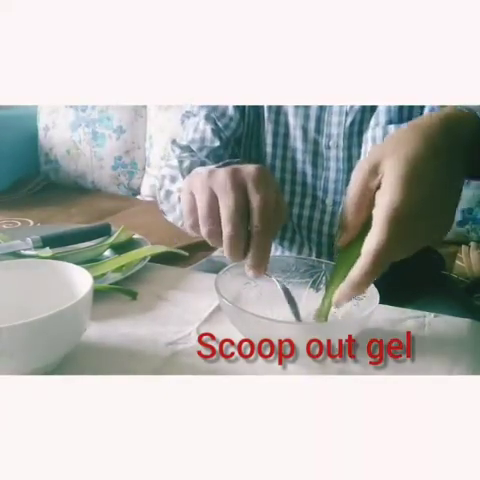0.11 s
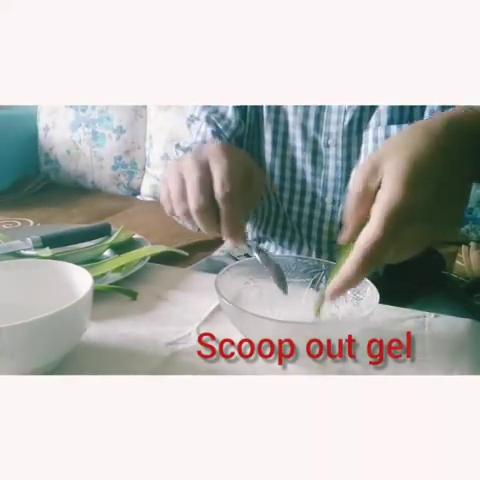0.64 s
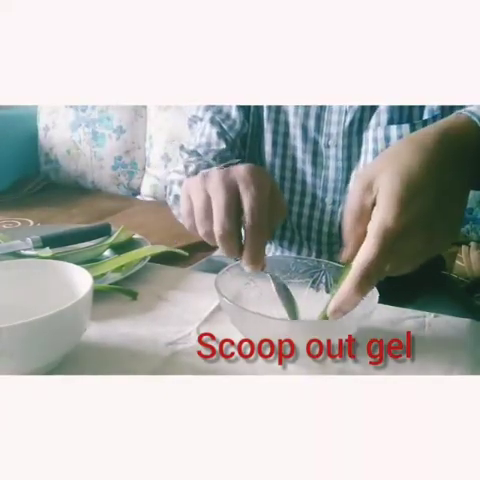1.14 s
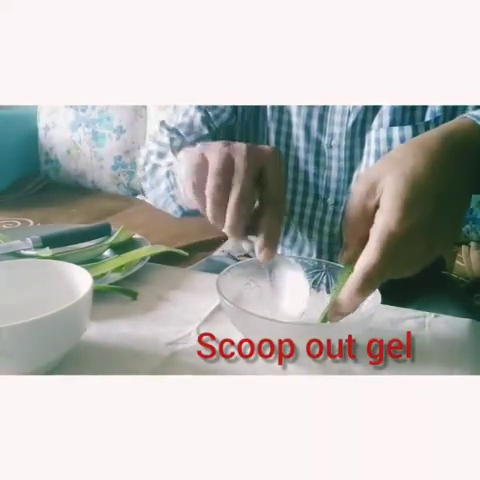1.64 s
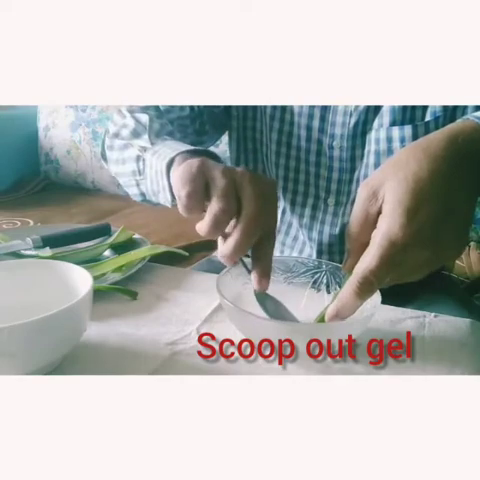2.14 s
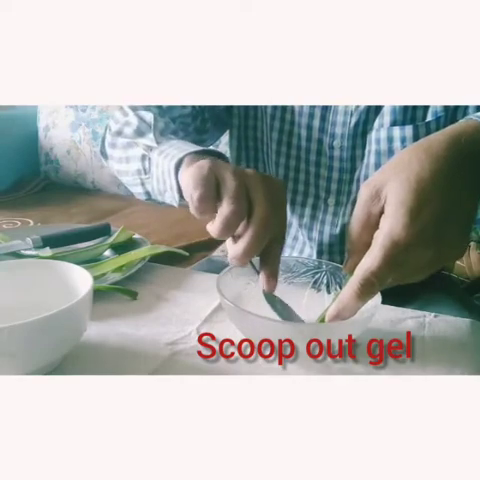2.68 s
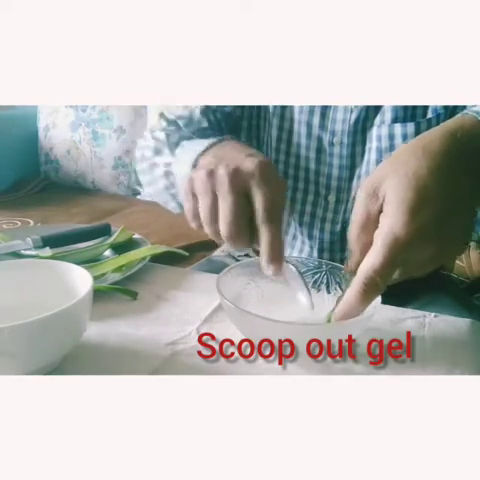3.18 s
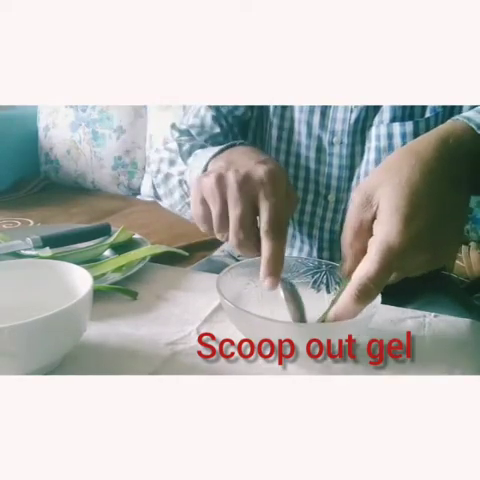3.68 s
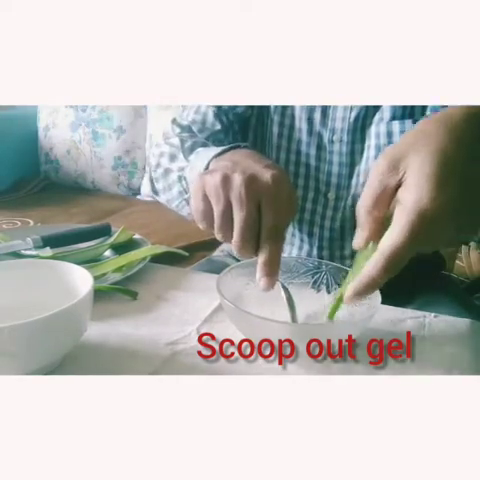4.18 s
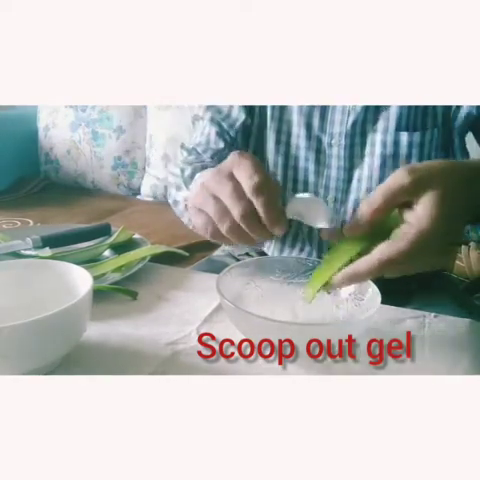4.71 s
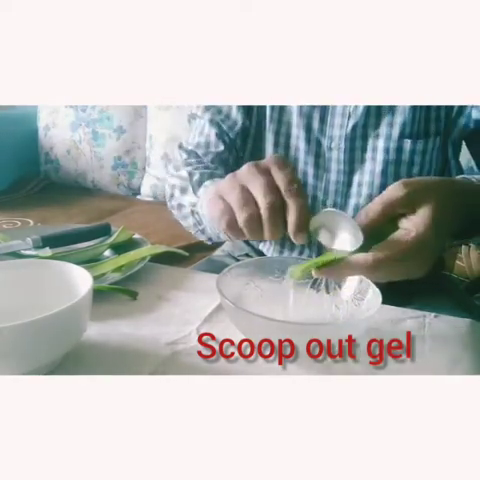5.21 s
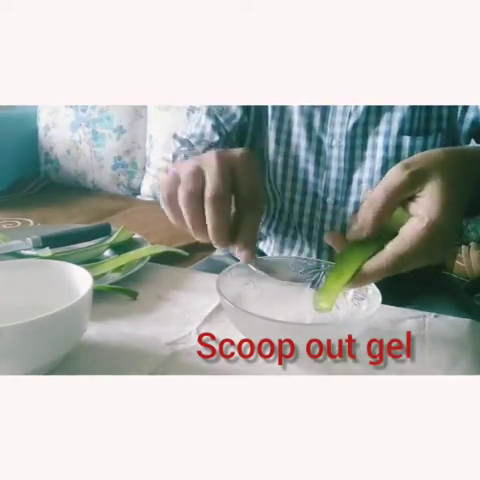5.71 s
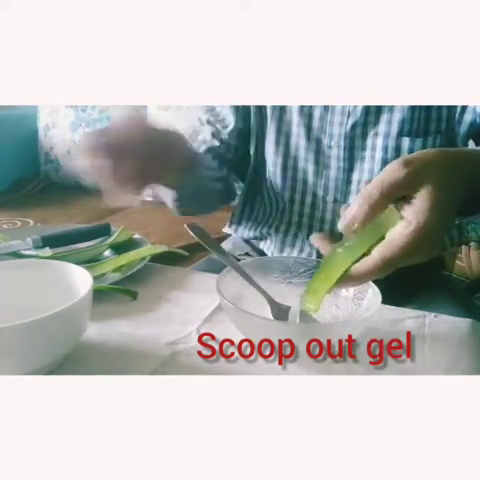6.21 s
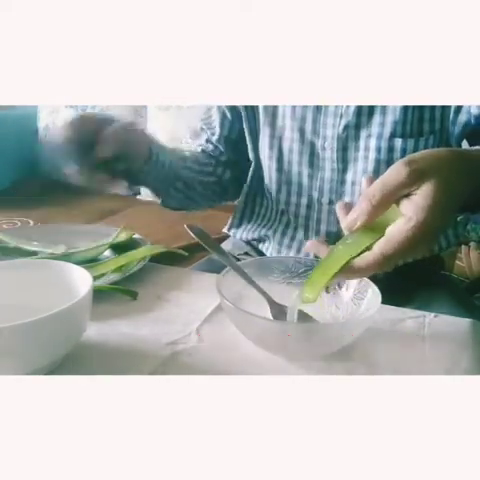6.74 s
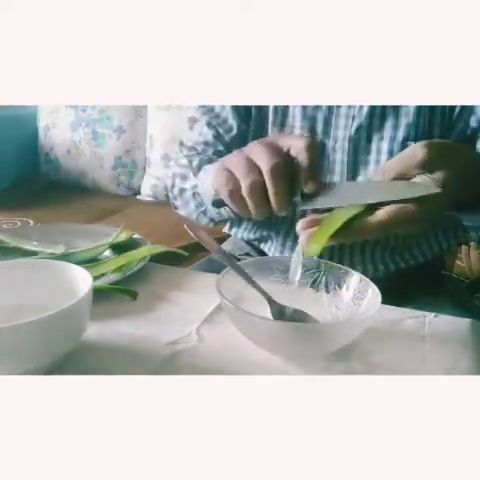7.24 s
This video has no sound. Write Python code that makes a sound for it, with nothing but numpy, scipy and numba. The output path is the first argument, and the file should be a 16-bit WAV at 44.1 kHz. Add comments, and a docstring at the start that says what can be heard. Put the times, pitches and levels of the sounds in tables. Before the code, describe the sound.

Sparse spoon taps on glass, thudding wind on the microphone, tiny wet blips and distant chirps, ending with a bright spoon drop chattering on the bowl before quiet.

```python
"""A steel spoon clinks in a glass bowl, then is dropped in: sums of decaying modes plus short noise cracks.
A draught rumbles and buffets two microphone ports (filtered noise, short swings) and whistles at the left one.
Small birds chirp outside (warbled sines); wet gel pops (rising sines); a soft room hum is coloured noise.
The loud drop makes the phone turn its gain down."""
import sys
import numpy as np
from scipy import signal
from scipy.fft import rfft, irfft
from scipy.io import wavfile
from scipy.ndimage import uniform_filter1d, minimum_filter1d
from numba import njit

SR = 44100
rng = np.random.default_rng(int(sys.argv[2]) if len(sys.argv) > 2 else 0)


def ratio(d):
    """dB to gain"""
    e = np.asarray(d, float) / 20
    return 10 ** e


def digitize_waveform(pressure):
    """Quantize a signal to 16-bit integers and store it at the path in sys.argv[1].

    Rows of a 2-D input are taken as channels; values are limited to [-1, 1].
    """
    field = np.atleast_2d(pressure).T
    bounded = np.clip(field, -1, 1)
    quanta = np.round(bounded * 32767).astype(np.int16)
    wavfile.write(sys.argv[1], SR, quanta)


N = 325017
T = np.arange(N) / SR
SIDES = np.array([[1], [-1]])  # left, right
ROOM_T60_S, ROOM_DB = 0.24, -1.5


def unit(x):
    """Scale to rms 1."""
    return x / np.sqrt(np.mean(x ** 2))


def colour(x, points):
    """Give noise the spectrum of (Hz, dB) points."""
    hz, db = np.transpose(points)
    f = np.arange(x.shape[-1] // 2 + 1) * SR / x.shape[-1] + 1
    gain = ratio(np.interp(np.log(f), np.log(hz), db))
    return irfft(rfft(x) * gain, x.shape[-1])


def band(x, hz, width_hz):
    """One resonance."""
    return signal.lfilter(*signal.iirpeak(hz, hz / width_hz, fs=SR), x)


def walk(rate_hz):
    """Random levels held 1 / rate_hz and slewed twice, rms 1."""
    k = int(SR / rate_hz)
    steps = np.repeat(rng.standard_normal(N // k + 1), k)
    return unit(uniform_filter1d(uniform_filter1d(steps, k), k)[:N])


def swell(base_db, rows, rise_s, fall_s):
    """Gain of a base level plus, in power, swells that rise, hold and die away exponentially."""
    power = ratio(base_db) ** 2
    for s, held_s, db in rows:
        early = np.maximum(s - T, 0) / rise_s
        late = np.maximum(T - s - held_s, 0) / fall_s
        power = power + ratio(db) ** 2 * np.exp(-2 * (early + late))
    return np.sqrt(power)


def add(out, s, x):
    """Mix x in at time s."""
    i = max(int(s * SR), 0)
    out[..., i:i + x.shape[-1]] += x[..., :N - i]


def echo(x, t60_s, db, gap_s):
    """Direct sound plus a diffuse tail, different at each port."""
    t = np.arange(SR // 2) / SR
    tail = rng.standard_normal((2, len(t))) * ratio(-60 * t / t60_s) * (1 - np.exp(-t / gap_s))
    tail = tail / np.sqrt(np.sum(tail ** 2, axis=1, keepdims=True))
    return x + ratio(db) * signal.fftconvolve(x, tail, axes=1)[:, :N]


# Modes of the spoon, the bowl pressed down by the hand, the bowl ringing free, its thick floor.
# Each row: frequency in Hz, relative level in dB, t60 in seconds.
SPOON_MODES = [(1573, -8.5, 0.017), (1977, -10.5, 0.032), (2685, -18, 0.062), (3753, -16, .1),
               (4530, -4.5, 0.011), (5860, -17, .03), (8550, -15, 0.068), (10270, 0.5, 0.057),
               (10160, 3.5, 0.021), (11643, -11.5, 0.13), (12720, -11, 0.057), (13350, -10.5, .06),
               (14530, -18.5, .08), (15700, -13, .02), (15670, -14, .08)]
BOWL_HELD_MODES = [(1252, -27, 0.038), (2350, -20.5, 0.066), (3470, -12.5, 0.015), (4870, -3, 0.011),
                   (5750, -3, 0.0097), (7770, 6.5, 0.011), (8440, -15.5, 0.12), (9176, 5, 0.021),
                   (9660, -3, 0.037), (10100, 9.5, 0.0073), (11000, -9, 0.035), (10970, -6.5, 0.063),
                   (11500, -1.5, 0.023), (12830, -1.5, 0.03), (15600, 5, 0.014), (14600, -8, 0.022)]
BOWL_FREE_MODES = [(2100, -25, .06), (2476, -13, .22), (2510, -20, .15), (2940, -27, .08), (3590, -23, .09),
                   (4286, -11, .11), (4310, -18, .15), (5060, -16, .1), (5142, -22, .22), (5570, -19, .04),
                   (6420, -15, .12), (6514, -17, .28), (6700, -16, .1), (7466, -13, .16), (7830, -20, .06),
                   (6990, -19, .06), (8940, -13, .12), (9024, 1, .2), (9500, -18, .06), (10100, -16, .06),
                   (10606, -8, .16), (11940, -4, .15), (12300, -16, .08), (12700, -12, .06),
                   (13545, -13, .14), (13928, -7, .14), (14347, -13, .12), (14543, -14, .14),
                   (15104, -9, .15), (15715, -25, .2)]
BOWL_FLOOR_MODES = [(1108.5, -4, 0.24), (3457, -13, 0.017), (4370, -4.5, .03), (5120, 6, 0.041),
                    (5614, -9.5, .03)]
# Ring balance over frequency. Each row: frequency in Hz, left minus right in dB.
RING_PAN = [(1100, -9.5), (2500, -0.5), (4400, -1.5), (9000, -4.5), (12000, 12), (15000, 2)]
# Further balance of the four mode sets: left minus right in dB.
BODY_PAN_DB = [-2.5, -1, 0, 2]


def ring(blows):
    """Each blow excites the four sets of decaying modes, with its own random strike point."""
    t, out = np.arange(SR * 2 // 5) / SR, np.zeros((2, N))
    sets = (SPOON_MODES, BOWL_HELD_MODES, BOWL_FREE_MODES, BOWL_FLOOR_MODES)
    hz, db, t60_s = np.transpose([mode for modes in sets for mode in modes])
    body = np.repeat(np.arange(len(sets)), [len(modes) for modes in sets])
    onset = 1 - np.exp(-t / 0.00023)
    rings = np.exp(np.outer(2j * np.pi * hz - np.log(1000) / t60_s, t)) * onset
    pan_hz, pan_db = np.transpose(RING_PAN)
    side_db = np.interp(np.log(hz), np.log(pan_hz), pan_db) + np.array(BODY_PAN_DB)[body]
    ports = np.exp(2j * np.pi * rng.random((2, len(hz))))  # each mode has its own phase at each port
    octaves_up = np.clip(np.log2(hz / 10500), 0, 1)
    for s, *body_db, _ in blows:
        spot = ratio(2.5 * rng.standard_normal(len(hz))) * np.exp(2j * np.pi * rng.random(len(hz)))
        dull_db = 3.0 * min(max(body_db) + 45.5, 0) * octaves_up  # a light touch misses the top modes
        level_db = db + dull_db + np.array(body_db)[body] + SIDES * side_db / 2
        add(out, s, ((ratio(level_db) * spot * ports) @ rings).imag)
    return out


# Spectrum of the contact crack. Each row: frequency in Hz, relative density in dB per Hz.
CRACK_SPECTRUM = [(500, -48), (1000, -3.5), (2000, -2), (4000, -1.5), (7000, -3.5), (10000, -1), (14500, 2),
                  (16000, -28.5)]


def cracks(blows):
    """Short noise burst at each contact, with a quick rise of a few ms and a quick decay."""
    out, t = np.zeros((2, N)), np.arange(-512, 1024) / SR
    shape = np.exp(np.where(t < 0, t / 0.0017, -t / 0.0016))
    for s, *_, db in blows:
        n = rng.standard_normal((3, len(t)))
        noise = n[:2] + 0.9 * n[2]  # partly shared by the ports
        add(out, s + t[0], ratio(db) * shape * unit(colour(noise, CRACK_SPECTRUM)))
    return out


# The dropped spoon rocks and chatters on the rim, leaning on the glass. Each row: time in seconds,
# tap strength in dB, level of the whole clink layer in dB (interpolated; end values held outside).
CHATTER = [(6.152, -17.5, -1.5), (6.182, -9.5, 0), (6.201, -6.5, -1), (6.21, -25.5, -4), (6.24, -11, 3),
           (6.263, -23.5, 2), (6.276, -17, -0.5), (6.308, -20.5, 1.5), (6.335, -31, -3.5), (6.36, -26, -3)]


def chatter():
    """30 near-even taps on the free bowl, strength following the chatter table."""
    when, strength_db, _ = np.transpose(CHATTER)
    taps = np.linspace(when[0], when[-1], num=30) + .005 * rng.random(30)
    tap_db = np.interp(taps, when, strength_db)
    return [(s, db - 39.5, db - 12.5, db, db - 26, db - 37.5) for s, db in zip(taps, tap_db)]


# Spoon blows. Each row: time in seconds, then levels in dB of the spoon, held bowl, free bowl,
# bowl floor and crack.
BLOWS = [(0.066, -27.5, -48.5, -68, -51.5, -28.5), (0.491, -49.5, -82, -90, -82, -82),
         (1.097, -18, -46, -63, -43, -16.5), (1.103, -18, -47.5, -64, -54.5, -24.5),
         (2.691, -39.5, -20, -57.5, -52.5, -34.5), (2.695, -50.5, -43, -80, -64, -37),
         (3.923, -32.5, -64, -68, -75, -33), (3.935, -42, -65, -73.5, -69, -68),
         (4.421, -53, -80, -92, -92, -77.5), (6.012, -58, -50, -57.5, -68, -48),
         (6.024, -47.5, -39.5, -52, -67.5, -44), (6.028, -40, -28, -49, -44, -46),
         (6.031, -48.5, -31, -41.5, -44.5, -59.5), (6.035, -41, -37.5, -47, -38.5, -44),
         (6.149, -30.5, -17.5, -10, -49, -28.5)]


def clinks():
    """Spoon on glass: ringing modes and cracks of every blow and tap, in the room."""
    blows = list(BLOWS) + chatter()
    when, _, layer_db = np.transpose(CHATTER)
    wet = echo(ring(blows) + cracks(blows), ROOM_T60_S, ROOM_DB, 0.0049)
    return wet * ratio(np.interp(T, when, layer_db))


# Base draught under gusts and swells. Each row: time in seconds, left rumble in dB, right rumble in dB,
# whistle at the left port in dB. Rumble levels are ahead of the port high-pass.
BREEZE = [(0.0, -57, -50, -60), (1.301, -60.5, -57, -60.5), (2.0, -62.5, -56, -62),
          (2.9, -60, -58.5, -62.5), (3.1, -62.5, -62, -58.5), (3.55, -66.5, -68, -58.5),
          (4.0, -64, -53, -59), (4.45, -65.5, -71.5, -64), (4.8, -63.5, -65, -65.5), (5.1, -91, -100, -61),
          (5.3, -73, -66, -81), (5.55, -59.5, -52, -62), (6.05, -55.5, -52, -68.5), (6.3, -61, -66, -62.5),
          (6.501, -59.5, -68, -60), (6.7, -87.5, -84.5, -76), (7.15, -97, -76, -79), (7.37, -66, -60, -73)]
# Gusts. Each row: time at full level in seconds, hold in seconds, rumble in dB, port (0 left, 1 right).
GUSTS = [(0.08, 0.11, -44, 1), (0.251, 0.22, -33, 1), (0.21, 0.12, -40, 0), (0.47, 0.034, -49, 0),
         (0.609, 0.057, -42.5, 1), (0.71, 0.089, -39.5, 1), (0.83, 0.071, -50, 0), (0.948, 0.16, -43.5, 1),
         (1.041, 0.068, -47.5, 0), (1.47, 0.034, -61.5, 0), (1.58, 0.18, -49, 1), (2.53, 0.1, -51, 1),
         (2.73, 0.09, -39, 1), (3.79, 0.13, -45.5, 1), (3.88, 0.13, -56, 0), (4.178, 0.027, -45.5, 1),
         (5.34, 0.078, -40.5, 1), (5.576, 0.062, -32, 1), (5.58, .12, -47.5, 0), (5.66, 0.1, -43.5, 1),
         (6.38, 0.048, -54.5, 0), (6.421, 0.075, -52.5, 1), (6.88, 0.048, -57, 1), (7.27, .12, -43.5, 1)]


def rumble_gain(port):
    """Breeze plus the gusts that hit this port."""
    breeze = np.transpose(BREEZE)
    gusts = [gust[:-1] for gust in GUSTS if round(gust[-1]) == port]
    return swell(np.interp(T, breeze[0], breeze[1 + port]), gusts, rise_s=0.0113, fall_s=0.045)


def rumble(gain):
    """Turbulent eddies: lumpy noise through two low resonances."""
    centre_hz, width_hz, lump_db = 146.8, 61.7, 2.5
    eddies = band(band(rng.standard_normal(N), centre_hz, 4.5 * width_hz), centre_hz, width_hz)
    low_pass = signal.butter(3, 420, fs=SR, output="sos")
    return unit(signal.sosfilt(low_pass, eddies * ratio(lump_db * walk(35)))) * gain


def chance_buffets(gain, port):
    """Random buffets that follow the rumble level; harder ones are quicker."""
    per_s, above_rumble_db, scatter_db = 40, 4.5, 4
    hz_at_minus_33_db, hz_per_db = 156.4, 3.5
    count = int(per_s * N / SR)
    at = rng.random(count) * T[-1]
    peak_db = 20 * np.log10(np.interp(at, T, gain)) + above_rumble_db
    peak_db = peak_db + scatter_db * rng.standard_normal(count)
    hz = np.maximum(hz_at_minus_33_db + hz_per_db * (peak_db + 33), 130)
    hz = hz * (1 + 0.22 * rng.standard_normal(count))
    return list(zip(at, peak_db, hz, [port] * count))


# Strongest buffets of air. Each row: time in seconds, envelope peak in dB ahead of the port high-pass,
# frequency in Hz, port (0 left, 1 right).
PUFFS = [(0.087, -27, 140, 1), (0.112, -28, 161, 1), (0.144, -31, 174, 1), (0.253, -25, 156, 0),
         (0.271, -25, 149, 1), (0.278, -35, 154, 0), (0.32, -24.5, 172, 1), (0.337, -17.5, 194, 1),
         (0.347, -21, 190, 1), (0.393, -17.5, 165, 1), (0.414, -14, 216, 1), (0.427, -17.5, 220, 1),
         (0.507, -19.5, 160, 1), (0.631, -26.5, 174, 1), (0.893, -31, 145, 0), (1.033, -28.5, 193, 0),
         (1.714, -25.5, 154, 1), (1.741, -26, 148, 1), (2.347, -32, 212, 0), (2.531, -29, 209, 0),
         (2.728, -22, 165, 1), (2.744, -25.5, 218, 1), (2.763, -28.5, 138, 1), (3.829, -23, 145, 1),
         (3.899, -31, 150, 1), (4.212, -33.5, 264, 0), (4.235, -32.5, 260, 0), (5.34, -24.5, 182, 1),
         (5.407, -28, 160, 1), (5.55, -29, 135, 1), (5.57, -18, 196, 1), (5.607, -13.5, 239, 1),
         (5.637, -25, 196, 1), (5.679, -25, 190, 1), (5.705, -29.5, 156, 1), (5.741, -26.5, 148, 1),
         (5.839, -36.5, 268, 0), (6.052, -33.5, 147, 1), (6.103, -35, 117, 0), (6.469, -28, 241, 1),
         (7.277, -28.5, 130.8, 1), (7.297, -27.5, 150, 1), (7.336, -33.5, 140, 1)]


def buffets(rows):
    """Each puff is about two pressure swings, dying slower than they rise."""
    out, t = np.zeros((2, N)), np.arange(-1024, 1024) / SR
    for s, db, hz, port in rows:
        cycles = t * hz / np.where(t < 0, .55, .9)
        swing = np.cos(2 * np.pi * (hz * t + rng.random()))
        add(out[round(port)], s + t[0], ratio(db) * np.exp(-cycles ** 2) * swing)
    return out


# Port cavity resonances. Each row: frequency in Hz, width in Hz, relative level in dB.
WHISTLE_MODES = [(611, 84, 4.5), (760, 44, -12)]
# Whistle swells. Each row: time at full level in seconds, hold in seconds, left-port level in dB.
WHISTLE_SWELLS = [(0.27, .25, -53), (0.58, 0.11, -54.5), (1.17, 0.079, -52.5), (1.57, 0.055, -58),
                  (2.08, 0.15, -53), (2.48, 0.069, -61.5), (2.88, 0.033, -60), (3.17, 0.18, -56),
                  (3.87, 0.23, -57.5), (4.6, 0.26, -55), (5.68, 0.044, -59.5), (5.88, .13, -56),
                  (6.57, .05, -51.5)]


def whistle():
    """Fluctuating air noise excites the cavity resonances; 14 dB weaker at the right."""
    air = rng.standard_normal(N) * ratio(2.8 * walk(25))
    tone = unit(sum(ratio(db) * band(band(air, hz, 2 * w), hz, w) for hz, w, db in WHISTLE_MODES))
    s, _, _, base_db = np.transpose(BREEZE)
    gain = swell(np.interp(T, s, base_db), WHISTLE_SWELLS, rise_s=0.03, fall_s=0.023)
    return tone * gain * ratio(np.array([[0], [-14]]))


def draught():
    """Turbulence unrelated left and right, less below the ports' 60 Hz corner, plus the whistle."""
    gains = [rumble_gain(port) for port in (0, 1)]
    rows = list(PUFFS) + chance_buffets(gains[0], 0) + chance_buffets(gains[1], 1)
    air = np.array([rumble(gain) for gain in gains]) + buffets(rows)
    return signal.sosfilt(signal.butter(1, 60, "high", fs=SR, output="sos"), air) + whistle()


# Bird calls. Each row: start in seconds, length in seconds, centre frequency in Hz, warble swing in Hz,
# level in dB before flutter and echo, left minus right in dB.
CHIRPS = [(0.196, 0.1, 6410, 335, -60.5, -15.5), (0.362, 0.12, 3837, 121, -64, 4),
          (1.288, 0.085, 6220, 250, -73, -21), (1.707, 0.1, 6430, 556, -72, -25.5),
          (2.446, 0.13, 6440, 250, -74.5, -21.5), (3.096, 0.09, 6530, 423, -64, -17.5),
          (3.259, 0.13, 3593, 60, -62.5, 7), (3.279, 0.083, 4140, 150, -67, 5),
          (3.288, 0.11, 5110, 200, -72.5, -10), (4.274, 0.065, 3880, 302, -64.5, 9),
          (4.45, 0.061, 6300, 202, -77, -20), (5.35, .06, 4980, 100, -73, -8.5),
          (5.467, 0.092, 6770, 148, -60, -5.5), (5.766, 0.034, 5900, 50, -69, -16),
          (5.902, 0.086, 3680, 118, -60.5, 1), (6.766, 0.066, 6740, 39.7, -62.5, -15),
          (7.195, .155, 6420, 202.6, -77.5, -17.5)]


def birds():
    """Fluttering whistles in quick falling sweeps, smeared by walls outside."""
    warble_hz, rasp_per_swing = 29.57, .3
    yard_t60_s, yard_db = 0.35, 1
    out = np.zeros((2, N))
    flutter, rasp = ratio(6.6 * walk(110)), walk(400)
    for s, length_s, hz, swing_hz, db, side_db in CHIRPS:
        t = np.arange(int(length_s * SR)) / SR
        pitch = hz * (1 - 0.01904 * (t / length_s - .5))
        pitch = pitch + swing_hz * signal.sawtooth(2 * np.pi * warble_hz * t, width=0)
        pitch = pitch + (30 + rasp_per_swing * swing_hz) * rasp[int(s * SR):][:len(t)]
        fade = np.clip(np.minimum(t, length_s - t) / 0.029, 0, 1)
        call = np.sin(2 * np.pi * np.cumsum(pitch) / SR) * fade
        add(out, s, ratio(db + SIDES * side_db / 2) * call)
    return echo(out * flutter, yard_t60_s, yard_db, 0.015)


# Short wet blips of gel. Each row: start in seconds, relative level in dB, starting frequency in Hz,
# left minus right in dB.
BLIPS = [(0.651, -45.5, 685, 11), (0.8, -56.5, 653, -5.5), (1.29, -58.5, 796, -5), (2.139, -52, 617, 15.5),
         (2.446, -54, 763, 7), (2.805, -60, 1165, 13), (4.68, -63, 590, 1.5), (4.953, -51, 797, 9),
         (5.268, -62.5, 1217, -4)]


def gel():
    """Small wet pops, sines of rising pitch that ring a few cycles: clear ones placed, faint ones by chance."""
    out, t = np.zeros((2, N)), np.arange(2048) / SR
    faint = rng.random((120, 4)) * (N / SR, -8, 1.6, 24) + (0, -61.5, 0, -12)
    faint[:, 2] = 900 * 2 ** faint[:, 2]  # octaves to Hz
    for s, db, hz, side_db in list(BLIPS) + list(faint):
        envelope = (t / 0.0051) * np.exp(1 - t / 0.0059)
        pop = np.sin(2 * np.pi * hz * t * (1 + 0.65 * t)) * envelope
        add(out, s, ratio(db + SIDES * side_db / 2) * pop)
    return echo(out, ROOM_T60_S, ROOM_DB, 0.0036)


def patchy(x, db):
    """Let the level waver in small patches of time and pitch."""
    z = signal.stft(x, nperseg=512)[2]
    spots = uniform_filter1d(rng.standard_normal(z.shape), size=5, axis=1)
    spots = uniform_filter1d(spots, size=5, axis=2)
    return signal.istft(z * ratio(db * unit(spots)), nperseg=512)[1][:, :N]


# Hum spectrum. Each row: frequency in Hz, relative density in dB per Hz.
HUM_SPECTRUM = [(30, -25.5), (60, -19.5), (120, -7.5), (220, 1), (310, -3.5), (430, -12), (750, -7),
                (1050, -13.5), (2000, -14.5), (4500, -24), (7300, -29), (9500, -23), (11300, -20),
                (12800, -26), (15000, -35.5), (16500, -61.5)]


def hum():
    """Room tone and microphone hiss; the bass is shared by both ports, the treble is not."""
    own, shared = rng.standard_normal((2, N)), rng.standard_normal(N)
    low_pass = signal.butter(2, 600, fs=SR)
    mix = own + signal.lfilter(*low_pass, 1.55 * shared - 0.84 * own)
    level_db = -58 + 1.0 * walk(2.6)
    return ratio(level_db) * unit(patchy(colour(mix, HUM_SPECTRUM), db=2.2))


def scene():
    """All sources at the two ports."""
    return clinks() + draught() + birds() + gel() + hum()


@njit
def hold(x, attack, release):
    """Level follower, quick up and very slow down."""
    y, e = np.empty(len(x)), 0.
    for i in range(len(x)):
        e += (x[i] - e) * (attack if x[i] > e else release)
        y[i] = e
    return y


def band_limit(x):
    """A steep low-pass at the top of the band."""
    return signal.sosfilt(signal.butter(12, 16660, fs=SR, output="sos"), x)


def record(dry):
    """The gain drops once the level passes a ceiling and hardly returns; the highest peaks are rounded."""
    attack_s, release_s, ceiling_db = .002, 30, -2.2
    level = hold(np.abs(dry).max(axis=0), 1 / (attack_s * SR), 1 / (release_s * SR))
    gain = np.minimum(1, ratio(ceiling_db) / (level + 1e-9))
    gain = uniform_filter1d(minimum_filter1d(gain, size=256), size=256)
    x = dry * gain
    mix = x / (1 + np.abs(x / .95) ** 5) ** (1 / 5)
    return band_limit(mix)


dry = scene()
out = record(dry)
digitize_waveform(out)
```